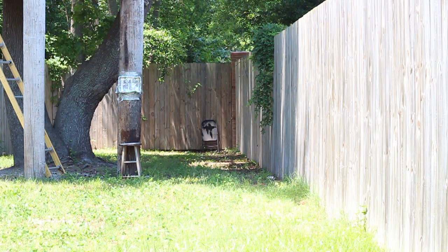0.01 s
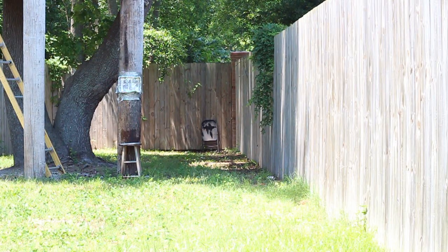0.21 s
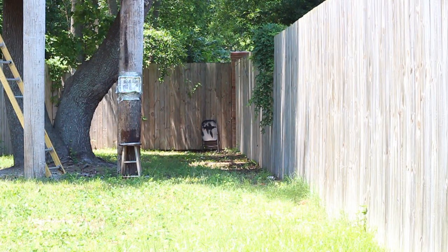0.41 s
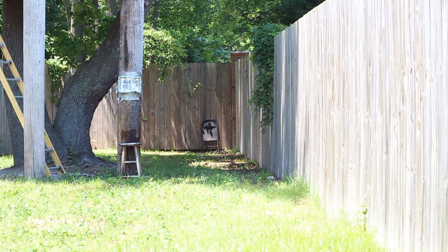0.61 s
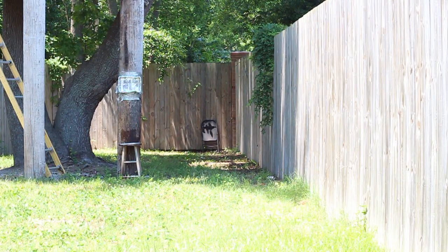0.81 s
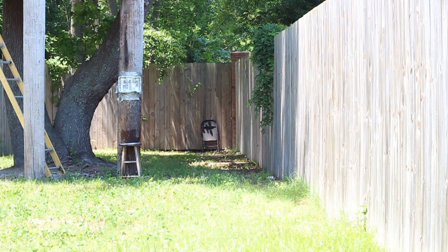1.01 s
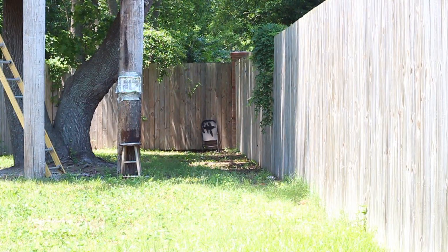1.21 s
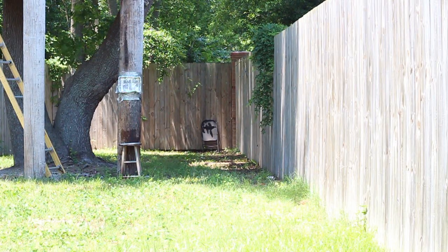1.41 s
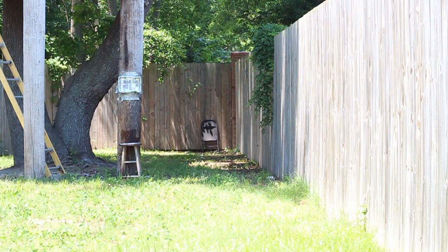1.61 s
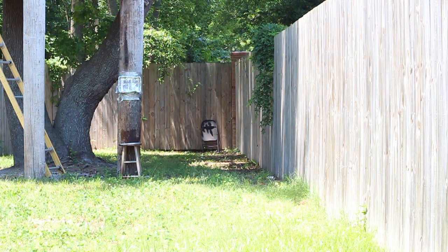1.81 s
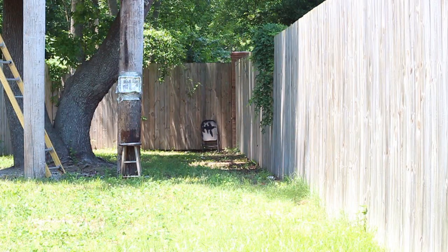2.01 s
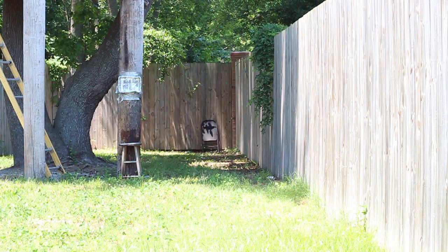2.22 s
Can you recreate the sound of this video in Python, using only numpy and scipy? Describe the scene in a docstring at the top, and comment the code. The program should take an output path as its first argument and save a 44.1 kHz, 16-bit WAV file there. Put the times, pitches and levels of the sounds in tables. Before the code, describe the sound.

Two sharp airsoft rifle pops with short gear whirrs in a yard, distant pellet hits returning after each

```python
"""A fenced yard: a wavering low hum, wind on the microphone, distant traffic and a faint insect run throughout.
First a pellet's far strike comes back as a hissing wash with a ringing sheet; its own shot is not heard.
Then an electric airsoft rifle fires two single shots close by. In each, gears wind the spring, the piston slams,
air pops from the muzzle, the fence echoes, the motor coasts down and stops, and a latch drops.
Half a second after each pop the far strike returns. Tones are sines or rung resonances; the rest is banded noise."""
import sys
import numpy as np
from scipy import signal
from scipy.io import wavfile
from scipy.ndimage import uniform_filter1d

SR = 44100
rng = np.random.default_rng(int(sys.argv[2]) if len(sys.argv) > 2 else 0)


def dump(signal):
    """Clip the signal to [-1, 1] and save it as 16-bit WAV at the path in sys.argv[1]."""
    limited = np.clip(np.atleast_2d(signal).T, -1, 1)
    pcm = np.round(limited * 32767).astype(np.int16)
    wavfile.write(sys.argv[1], SR, pcm)


N = 99225
T = np.arange(N) / SR   # time [s]


def amp(db):
    """Level in dB to linear amplitude."""
    return 10 ** (np.asarray(db) / 20)


def at_hz(points, hz, column=1):
    """Read a table column at a frequency, along a logarithmic frequency axis."""
    p = np.array(points)
    return np.interp(np.log(hz), np.log(p[:, 0]), p[:, column])


def curve(rows, column=1):
    """Draw a table column as straight lines over time."""
    p = np.array(rows)
    return np.interp(T, p[:, 0], p[:, column])


def swell(start, rise, t60, hold=0.):
    """Exponential rise that reaches 1 at start, a hold, then a decay of 60 dB per t60."""
    t = T - start
    rising = np.exp(np.clip(t / max(rise, 1e-4), -40, 0))
    falling = amp(-60 * np.clip(t - hold, 0, None) / t60)
    return np.where(t < 0, rising, falling)


def jitter():
    """Smoothed random wander of rms about 1, averaged over 100 samples."""
    return uniform_filter1d(rng.standard_normal(N), size=100) * 10


# How alike noise arrives at left and right: (frequency [Hz], likeness [0 to 1])
STEREO_LIKENESS = [(30, 0.93), (70, 0.68), (150, 0.54), (500, 0.65), (2000, 0.46), (6000, 0.92),
                   (14000, 0.46)]


def noise(spectrum, shape=lambda hz: 1):
    """Third-octave stereo noise, scaled to rms 1 before each band's own envelope."""
    out, power = 0, 0
    edges = 14 * 2 ** np.arange(0, 10.3, 1 / 3)
    white = rng.standard_normal((2, 2, N))
    for k, (low, high) in enumerate(zip(edges, edges[1:])):
        hz = np.sqrt(low * high)
        if spectrum[0][0] * .9 < hz < spectrum[-1][0] * 1.1:
            band = signal.butter(2, [low, high], "band", fs=SR, output="sos")
            mid, side = signal.sosfilt(band, white[k % 2])   # neighbouring bands use separate noise
            alike = np.clip(at_hz(STEREO_LIKENESS, hz), -1, 1)
            gain = amp(at_hz(spectrum, hz))
            stereo = np.sqrt(1 + alike) * mid + np.sqrt(1 - alike) * side * [[1], [-1]]
            out = out + gain * shape(hz) * stereo
            power += gain ** 2 * 4 * (high - low) / SR
    return out / np.sqrt(power)


def ring(drive, hz, t60):
    """Two-pole resonance: a unit click sets a sine of height 1 ringing."""
    r, w = amp(-60 / (t60 * SR)), 2 * np.pi * hz / SR
    return signal.lfilter([0, np.sin(w)], [1, -2 * r * np.cos(w), r * r], drive + 1e-18)


def modes(table, envelope):
    """Resonances of a body shaken by stereo noise under an envelope."""
    white = rng.standard_normal((2, N))
    drive = envelope * (white[0] + .4 * white[1] * [[1], [-1]])
    out = 0
    for k, (hz, db, t60) in enumerate(table):
        even_out = np.sqrt(t60 * SR * len(table) / 40)   # long rings gather more energy
        out = out + (-1) ** k * amp(db) * ring(drive, hz, t60) / even_out
    return out


# Wavering hum: (time [s], frequency [Hz], level [dB])
HUM_PATH = [(0.0, 91, -38.5), (0.15, 91.37, -44), (0.49, 92.64, -38.5), (0.9, 92.87, -34.5),
            (1.23, 92.08, -44.5), (1.27, 92, -46.5), (1.3, 92.5, -41.5), (1.4, 92, -60), (1.43, 91.13, -72),
            (1.49, 91.5, -47), (1.7, 93.15, -44.5), (1.87, 93.57, -35.5), (1.95, 93.8, -50),
            (2.07, 92.5, -43), (2.14, 92.4, -63), (2.25, 98.1, -46)]
HUM_OCTAVE_DB = -28.5


def hum():
    """A low sine wavering in pitch and level, with a weak octave."""
    phase = 2 * np.pi * np.cumsum(curve(HUM_PATH)) / SR
    tone = np.sin(phase) + amp(HUM_OCTAVE_DB) * np.sin(2 * phase)
    return np.sqrt(2) * amp(curve(HUM_PATH, column=2)) * tone


# Gusts at the microphone: (time [s], level [dB])
GUST_LEVELS = [(0.0, -40), (0.24, -37), (0.42, -42), (0.45, -37.5), (0.62, -38.5), (0.66, -47.5),
               (0.9, -43), (0.97, -47), (1.0, -33.5), (1.27, -28), (1.3, -34), (1.45, -27.5), (1.55, -40.5),
               (1.72, -37), (1.75, -45), (1.97, -40.5), (1.99, -41.5), (2.25, -42.5)]
# Their rumble: (frequency [Hz], relative density [dB per Hz])
GUST_SPECTRUM = [(8.8, -30), (15, 5), (52, -4.5), (97, -18), (119, -21), (145, -26.5), (300, -53),
                 (390, -90), (660, -120)]


def wind_on_microphone():
    """Wind buffets the microphone: deep noise that rises and falls."""
    return amp(curve(GUST_LEVELS)) * noise(GUST_SPECTRUM)


# Traffic far beyond the yard: (frequency [Hz], relative density [dB per Hz])
TRAFFIC_SPECTRUM = [(65, -36.5), (110, -6.5), (124, -24), (179, -31.5), (535, -39.5), (1000, -39),
                    (1110, -42.5), (2710, -49.5), (7780, -68.5), (9920, -66.5), (14000, -88)]
TRAFFIC_DB = -51.5


def distant_traffic():
    """Distance leaves mostly low, steady noise."""
    return amp(TRAFFIC_DB) * noise(TRAFFIC_SPECTRUM)


# Insect chirps: (time [s], length [s], level [dB])
INSECT_CHIRPS = [(.14, .06, -80), (.95, .06, -81), (1.10, .05, -81), (1.92, .06, -80)]
CHIRP_HZ, CHIRP_WIDTH_HZ = 9800, 72


def insect():
    """Noise through a narrow resonance, opened in short rounded chirps."""
    song = ring(rng.standard_normal((2, N)), CHIRP_HZ, 6.1 / CHIRP_WIDTH_HZ)
    gate = 0
    for start, length, db in INSECT_CHIRPS:
        gate = gate + amp(db) * np.sin(np.pi * np.clip((T - start) / length, 0, 1))
    return gate * song / song.std()


# Far strikes: (time [s], relative level [dB], second slap after strike [s], slap relative level [dB])
FAR_STRIKES = [(.236, -41, 0.028, -76), (1.168, -41, 0.036, -54), (2.078, -40.5, 0.028, -76)]
# Hissing wash: (frequency [Hz], relative density [dB per Hz])
WASH_SPECTRUM = [(410, -52), (700, -19.5), (1040, -9.5), (1520, -6), (1660, -3.5), (2000, -5.5), (3070, -4),
                 (11700, -7.5), (15000, -27.5), (16000, -55)]
# Its decay: (frequency [Hz], t60 [s])
WASH_T60 = [(1000, 0.69), (3500, 0.79), (7000, 0.39), (14000, 0.46)]
# Its onset: (frequency [Hz], rise time constant [s])
WASH_RISE = [(1000, 0.09), (1900, 0.014), (3500, 0.012), (7000, 0.00067), (14000, 0.0011)]
# Bright front of the strike: (frequency [Hz], relative density [dB per Hz])
FRONT_SPECTRUM = [(3000, -27), (5500, 11), (7500, -12), (9200, -16), (12500, 5), (15500, -15)]
# The struck sheet: (frequency [Hz], relative level [dB], t60 [s])
SHEET_MODES = [(1563, -12, 0.03), (1940, -4.5, .03), (2060, -8.5, 0.03), (2740, -8, 0.047),
               (3134, -3.5, 0.044), (3430, -1.5, 0.096), (3705, -0.5, 0.04), (4115, -2, 0.046),
               (4710, -8, 0.016), (5460, -4.5, 0.025)]
WASH_HOLD_S = 0.018
FRONT_DB, FRONT_T60_S = -4, 0.086
SHEET_DB, SLAP_T60_S = -5.5, 1


def strikes():
    """The strike scatters back, treble around 7 kHz first and briefest.

    The sheet rings under the wash, with a faint second slap in the middle strike.
    """
    def wash(hz):
        rise, t60 = at_hz(WASH_RISE, hz), at_hz(WASH_T60, hz)
        level = 0
        for s, db, *_ in FAR_STRIKES:
            onset = 1 - np.exp(-np.clip(T - s, 0, None) / rise)
            level = level + amp(db) * onset * swell(s, .001, t60, hold=WASH_HOLD_S)
        return level

    front = slaps = 0
    for s, db, after, slap_db in FAR_STRIKES:
        front = front + amp(db + FRONT_DB) * swell(s + 0.0016, 0.00079, FRONT_T60_S)
        slaps = slaps + amp(slap_db) * swell(s + after, 0.00062, SLAP_T60_S)
    sheet = modes(SHEET_MODES, amp(SHEET_DB) * wash(2700) + slaps)
    return noise(WASH_SPECTRUM, wash) + sheet + front * noise(FRONT_SPECTRUM)


# Muzzle pops: (time [s], relative peak [dB])
MUZZLE_POPS = [(.6163, 0), (1.5246, 0)]
# Gear cycle of each shot: (wind-up start before pop [s], gear level [dB], motor stop after pop [s],
#   latch after pop [s], latch level [dB], gears at start relative to gear level [dB], latch snap level [dB])
GEAR_CYCLES = [(.100, -37, 0.078, .106, -46.5, -14, -50), (0.11, -37.5, 0.076, .116, -43.5, -21, -43)]
# Gears under load: (frequency [Hz], relative density [dB per Hz])
GEAR_SPECTRUM = [(180, -60), (300, -37.5), (490, -9), (616, -17.5), (991, -6.5), (1090, -16.5), (1400, -2),
                 (2360, -15.5), (2970, -3.5), (4180, -16.5), (9640, -21), (13400, -30.5), (15000, -42)]
# Motor coasting, and the latch's snap: (frequency [Hz], relative density [dB per Hz])
COAST_SPECTRUM = [(180, -39.5), (300, -8), (801, 1.5), (1250, -1.5), (1880, -4.5), (2360, -9), (2970, -0.5),
                  (4620, -9), (10800, -12), (15000, -23.5)]
# Latch dropping: (frequency [Hz], relative density [dB per Hz])
LATCH_SPECTRUM = [(180, -25), (300, -9.5), (1700, -0.5), (2140, -14), (3220, -6.5), (8880, -32),
                  (12900, -20), (15000, -56)]
# Gear housing under the whirr: (frequency [Hz], relative level [dB], t60 [s])
HOUSING_MODES = [(770, -9, 0.027), (1060, -10, 0.014), (1364, -6.5, 0.058), (1687, -7, 0.034),
                 (2567, -3, 0.087), (3400, -6.5, 0.0083), (4110, -14.5, .03), (4930, -13.5, .015)]
WIND_RISE_S, WIND_DULL_DB_PER_OCT = 0.048, 2
ENGAGE_DB, ENGAGE_T60_S = 0, 0.045   # gears bite as the motor starts
COAST_DB, COAST_FALL_DB_PER_S, STOP_T60_S = -1.5, 44.5, 0.083
HALT_DB = -14   # the gears jolt as they stop
LATCH_T60_S, LATCH_SNAP_HOLD_S, LATCH_SNAP_T60_S = 0.22, 0.0055, 0.059
LATCH_RING_DB = -14   # latch in the housing
TEETH_PER_S, TOOTH_DEPTH, GRIT_DB = 260, 0.27, 2   # mean tooth rate; grit is rms


def gearbox():
    """Gears swell and brighten while winding the spring, coast after the shot, stop, and a latch drops."""
    cycles = [(pop[0], *cycle) for pop, cycle in zip(MUZZLE_POPS, GEAR_CYCLES)]

    def wind_up(hz):
        level = 0
        for s, lead, db, _, _, _, start_db, _ in cycles:
            dull_start = start_db - WIND_DULL_DB_PER_OCT * np.log2(hz / 1000)
            climb = np.interp(T - s + lead, [0, WIND_RISE_S], [dull_start, 0])
            level = level + amp(db + climb) * swell(s - lead, 0.0054, 0.076, hold=lead)
        return level

    bite = coast = latch = snap = 0
    for s, lead, db, stop, drop, latch_db, start_db, snap_db in cycles:
        bite = bite + amp(db + start_db + ENGAGE_DB) * swell(s - lead, .0005, ENGAGE_T60_S)
        slowing = amp(db + COAST_DB - COAST_FALL_DB_PER_S * np.clip(T - s, 0, 1))
        coast = coast + slowing * swell(s, 0.0017, STOP_T60_S, hold=stop)
        coast = coast + amp(db + HALT_DB) * swell(s + stop - .006, .002, 0.015)
        latch = latch + amp(latch_db) * swell(s + drop, 0.00029, LATCH_T60_S)
        snap_shape = swell(s + drop, 0.00057, LATCH_SNAP_T60_S, hold=LATCH_SNAP_HOLD_S)
        snap = snap + amp(snap_db) * snap_shape
    turn = np.cumsum(TEETH_PER_S / SR * (1 + .3 * jitter()))
    teeth = 1 + TOOTH_DEPTH * np.sin(2 * np.pi * turn)
    teeth = teeth * amp(GRIT_DB * jitter())
    housing = modes(HOUSING_MODES, wind_up(2000) + bite + amp(LATCH_RING_DB) * snap)
    whirr = noise(GEAR_SPECTRUM, wind_up) + housing
    turning = teeth * (whirr + coast * noise(COAST_SPECTRUM))
    return turning + latch * noise(LATCH_SPECTRUM) + snap * noise(COAST_SPECTRUM)


# The yard's tail: (frequency [Hz], relative density [dB per Hz], t60 [s])
YARD_TAIL = [(498, -5.5, .3), (1520, -4, 1), (4000, -3.5, .55), (9700, -3, 0.47), (15000, -22, .2)]
YARD_DB = -42.5


def yard_tail():
    """The yard answers each pop with diffuse noise, each band dying at its own rate."""
    def decay(hz):
        t60 = at_hz(YARD_TAIL, hz, column=2)
        return sum(swell(s + 0.0072, 0.0066, t60) for s, _ in MUZZLE_POPS)
    return amp(YARD_DB) * noise(YARD_TAIL, decay)


# Piston contacts: (time from pop [s], relative level [dB])
PISTON_KNOCKS = [(-.006, -12.5), (-.0004, -8.5), (.0050, 4.5), (.0073, 1.5), (.0097, -4.5), (0.0133, -3.5)]
# Rifle shell: (frequency [Hz], relative level [dB], t60 [s])
SHELL_MODES = [(129.2, -9.5, .03), (264, -10, 0.07), (315, -10, 0.044), (494, -11.5, 0.065),
               (623.7, -9, 0.03), (850, -3, 0.025), (1120, -13, 0.025), (1234, -5, 0.013),
               (2538, -13.5, 0.019), (3660, -23.5, 0.033)]
SHELL_DB = -26


def shell():
    """The piston's contacts are clicks that set the shell's resonances ringing."""
    knock = np.zeros(N)
    for s, db in MUZZLE_POPS:
        for at, knock_db in PISTON_KNOCKS:
            knock[int((s + at) * SR)] -= amp(db + SHELL_DB + knock_db)
    return sum(amp(db) * ring(knock, hz, t60) for hz, db, t60 in SHELL_MODES)


# Bright bursts of air: (time from pop [s], level relative to pop [dB], rise [s], t60 [s])
AIR_BURSTS = [(-.010, -29, .0005, .025), (-.0063, -23, .0003, .006), (-.003, -21, .0007, .04),
              (-.0009, -20, .0004, .003), (.0012, -28, .0008, .05), (.0052, -22, .0005, .012),
              (.013, -29, .002, .04), (.021, -32, .002, .07)]
# Rushing air: (frequency [Hz], relative density [dB per Hz])
AIR_SPECTRUM = [(590, -35.5), (1000, -5), (1480, -9), (2740, -3.5), (3930, -6), (5630, -2.5), (6110, -6),
                (8850, -3), (13100, -5.5), (16000, -16)]


def rushing_air():
    """Air hisses in short bursts of noise before and after each pop."""
    rush = 0
    for s, db in MUZZLE_POPS:
        for at, burst_db, rise, t60 in AIR_BURSTS:
            rush = rush + amp(db + burst_db) * swell(s + at, rise, t60)
    return rush * noise(AIR_SPECTRUM)


# Muzzle crack: (frequency [Hz], relative level [dB], right lag [samples])
JET_TONES = [(2300, -12.5, 0), (4200, -12, 0), (6000, -13, 1), (8700, -3.5, 1), (13000, -6.5, 2)]
POP_S = .0011   # the jet swells and is shut off
FENCE_S, FENCE_DB, FENCE_RIGHT_DB = .0047, -7, -6   # echo delay, level, and right relative to left
SQUEAK_S, SQUEAK_HZ, SQUEAK_DB, SQUEAK_T60_S = .0011, 12800, -7.5, .004   # just before the pop
SQUEAK_RIGHT_LAG = 2   # samples


def muzzle_pop():
    """A nozzle squeak, then a jet of a few tones under one short bump, and its echo off the fence."""
    click, nozzle = np.zeros((2, N)), np.zeros((2, N))
    for s, db in MUZZLE_POPS:
        click[:, int((s - POP_S / 2) * SR)] += amp(db)
        echo_db = db + FENCE_DB + np.array([0, FENCE_RIGHT_DB])
        click[:, int((s + FENCE_S - POP_S / 2) * SR)] += amp(echo_db)
        nozzle[[0, 1], int((s - SQUEAK_S) * SR) - 8 + np.array([0, SQUEAK_RIGHT_LAG])] += amp(db)
    sample = np.arange(int(POP_S * SR))
    jet = 0
    for hz, db, right_lag in JET_TONES:
        t = (sample - np.array([[0], [right_lag]])) / SR - POP_S / 2
        polarity = np.sign(7000 - hz)   # tones above 7 kHz are inverted
        jet = jet + amp(db) * polarity * np.sin(2 * np.pi * hz * t)
    jet = jet * np.hanning(len(sample))
    pop = signal.fftconvolve(click, jet, axes=1)[:, :N]
    return pop + amp(SQUEAK_DB) * ring(nozzle, SQUEAK_HZ, SQUEAK_T60_S)


LEFT_DB = 1.0   # left raised and right lowered by this much


def scene():
    """All sources, from the background to the muzzle, slightly to the left."""
    background = hum() + wind_on_microphone() + distant_traffic() + insect()
    shots = yard_tail() + shell() + rushing_air() + muzzle_pop()
    return (background + strikes() + gearbox() + shots) * amp([[LEFT_DB], [-LEFT_DB]])


OVERLOAD_TOP, CUTOFF_HZ = .88, 16900   # ceiling in full-scale units


def record(dry):
    """Overload rounds the peaks, then the top of the treble is cut."""
    rounded = OVERLOAD_TOP * np.tanh(dry / OVERLOAD_TOP)
    return signal.sosfilt(signal.cheby2(12, 70, CUTOFF_HZ, fs=SR, output="sos"), rounded)


dry = scene()
out = record(dry)
dump(out)
```